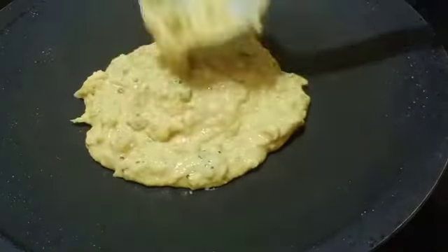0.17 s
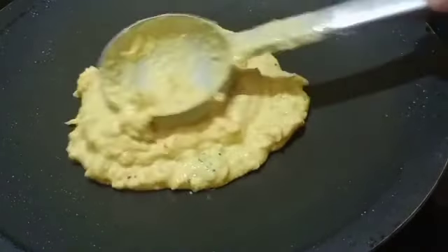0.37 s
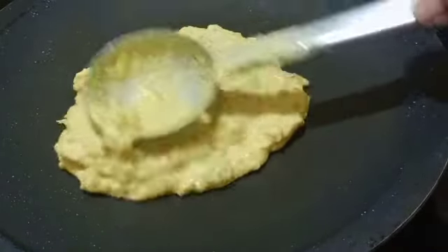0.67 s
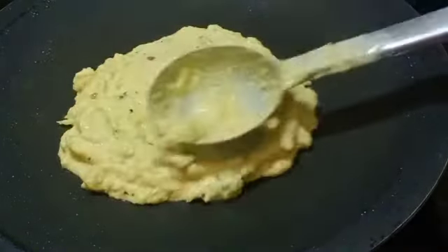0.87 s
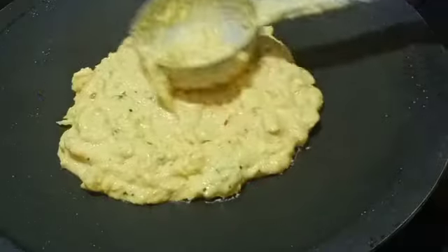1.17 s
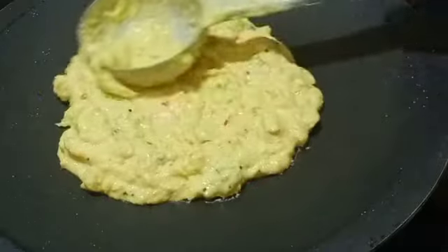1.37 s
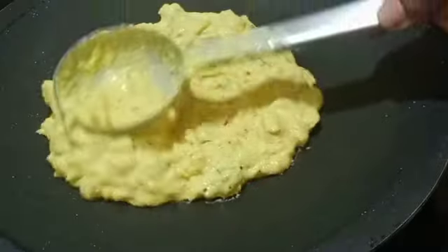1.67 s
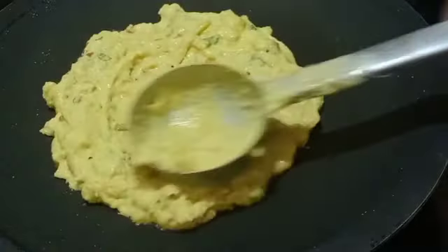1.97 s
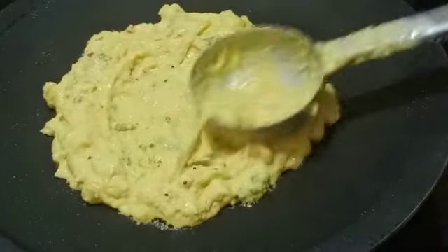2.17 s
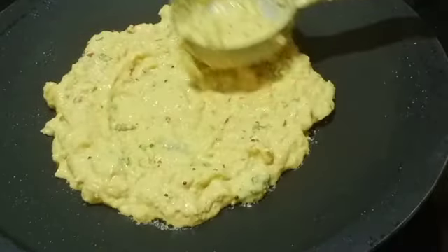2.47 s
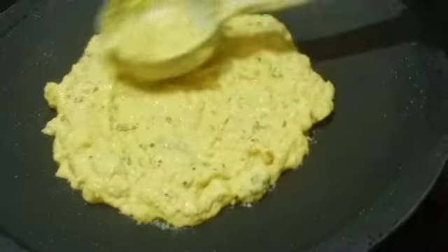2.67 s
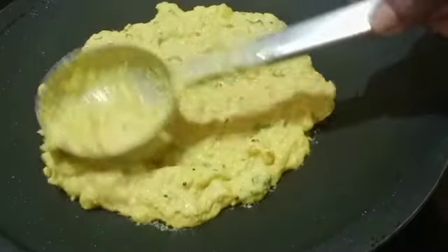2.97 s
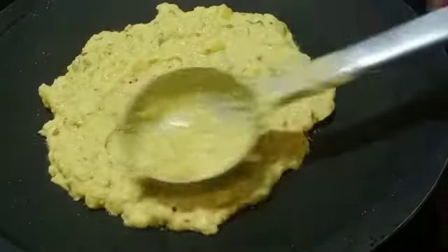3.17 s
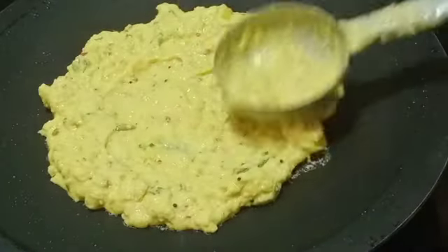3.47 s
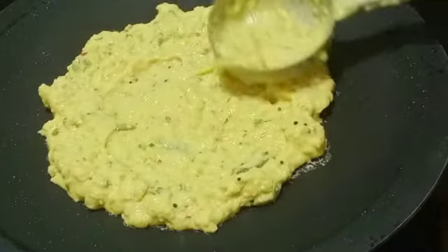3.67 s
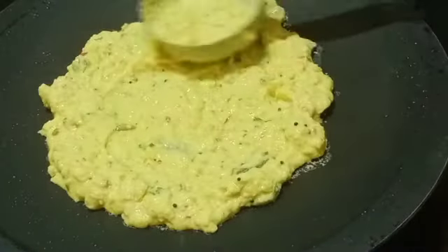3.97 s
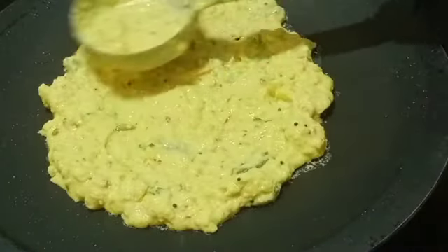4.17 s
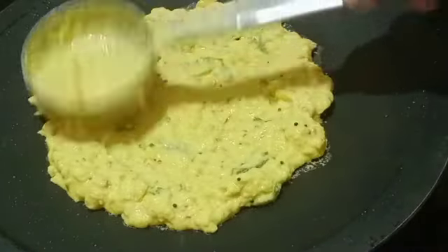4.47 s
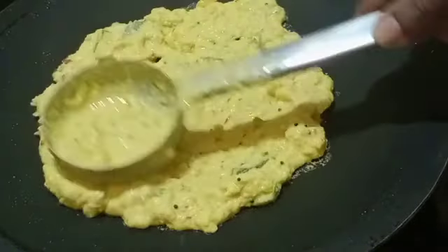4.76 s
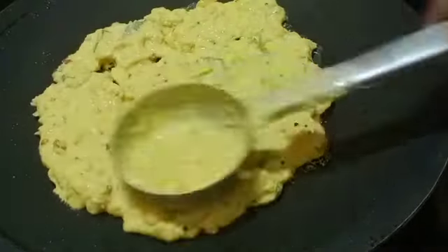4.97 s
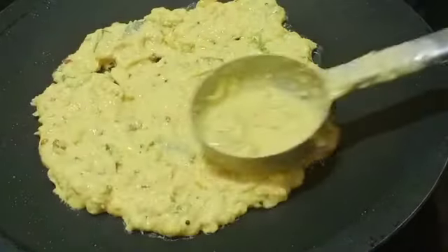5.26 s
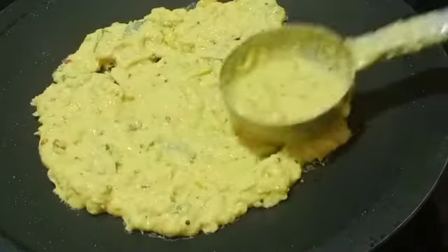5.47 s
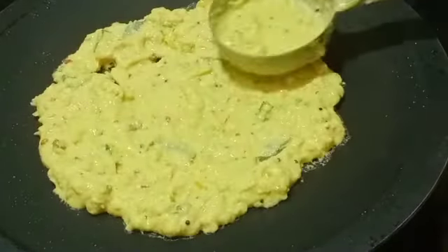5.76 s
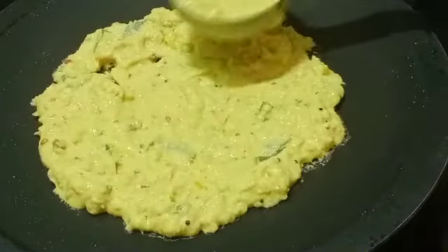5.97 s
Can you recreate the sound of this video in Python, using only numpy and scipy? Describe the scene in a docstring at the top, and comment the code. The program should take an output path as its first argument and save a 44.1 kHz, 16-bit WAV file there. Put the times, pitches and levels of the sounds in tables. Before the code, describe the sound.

Close, bright sizzling of batter on a griddle rises and falls with sharp little pops, while a fan drones behind it.

```python
"""A kitchen fan runs throughout, and thick batter poured on a hot griddle simmers and spits. From about
0.6 s a ladle spreads it in four circles. Each presses wet batter onto hot metal, where thousands of tiny
steam bubbles burst: a fine fizz at the edge, a lower sputter underneath. A faint whine fades after 2 s,
and the griddle rings less as batter covers it. Sharp spits crack to the end, the loudest near 4.3 s.
A close mono phone microphone, whose port rings near 9 kHz, hears it all in a small kitchen."""
import sys
import numpy as np
from scipy import signal
from scipy.fft import rfft, irfft
from scipy.io import wavfile
from scipy.ndimage import map_coordinates

SR = 44100
rng = np.random.default_rng(int(sys.argv[2]) if len(sys.argv) > 2 else 0)


def generate_wav(signal):
    """Clip the signal to [-1, 1] and save it as 16-bit WAV at the path in sys.argv[1]."""
    frames = np.transpose(np.atleast_2d(signal))
    scaled = np.clip(frames, -1, 1) * 32767
    pcm = np.round(scaled).astype(np.int16)
    wavfile.write(sys.argv[1], SR, pcm)


N = 270024
TIME = np.arange(N) / SR


def undb(db):
    """Decibels to gain."""
    return 10 ** (np.asarray(db) / 20)


def unit(x):
    """Scale to rms 1."""
    return x / np.sqrt(np.mean(x ** 2))


def power_sum(levels_db):
    """Level in dB of unrelated sounds heard together."""
    return 10 * np.log10(sum(undb(db) ** 2 for db in levels_db))


def drift(rate):
    """Smooth random movement of rms 1 that changes about rate times a second."""
    knots = rng.standard_normal(4096)
    return unit(map_coordinates(knots, [TIME * rate], order=3, mode="wrap"))


def colour(x, curve, size=4096):
    """Minimum-phase EQ through (Hz, dB) points, so that clicks keep their sharp front."""
    hz, db = np.transpose(curve)
    grid_hz = np.maximum(np.fft.rfftfreq(size, 1 / SR), 1)
    gain = undb(np.interp(np.log(grid_hz), np.log(hz), db))
    cepstrum = irfft(np.log(gain))
    cepstrum[1:size // 2] *= 2
    cepstrum[size // 2 + 1:] = 0
    impulse = irfft(np.exp(rfft(cepstrum)))
    return signal.fftconvolve(x, impulse)[:N]


def ringing(x, modes):
    """The ring that a sound drives in resonances given as (Hz, width in Hz, gain in dB)."""
    return sum(undb(db) * signal.lfilter(*signal.iirpeak(hz, hz / width, fs=SR), x)
               for hz, width, db in modes)


def kitchen(x, t60=0.23, room_db=-10):
    """A sound from one spot plus the short diffuse tail that close walls give it."""
    age = np.arange(SR // 4) / SR
    tail = rng.standard_normal(len(age)) * np.exp(-np.log(1000) * age / t60) * (age > .003)
    return x + undb(room_db) * signal.oaconvolve(x, tail / np.linalg.norm(tail))[:N]


def whine(hz=772, held_db=-65.5, fade_from_s=2.17, fade_db_per_s=50):
    """A thin, unsteady tone in the background holds, then fades away."""
    level_db = held_db - fade_db_per_s * np.maximum(TIME - fade_from_s, 0)
    phase = 2 * np.pi * np.cumsum(hz * (1 + 0.0126 * drift(30.1))) / SR
    return np.sqrt(2) * undb(level_db + drift(13)) * np.sin(phase)


def fan(shaft_hz=24.61, blades=7, air_db=-51):
    """Blade tone and shaft harmonics hum over the rush of air through the housing."""
    # The hum. Each row: multiple of the shaft rate, rms level in dB.
    hum_tones = [(4, -77), (5, -63.5), (6, -66), (7, -50.5), (8.08, -61.5), (9, -63.5), (10, -80.5),
                 (12, -65), (15, -69.5), (16, -62.5), (19, -64.5), (21, -74), (23, -65), (26, -72),
                 (30, -86), (32, -79)]
    # Tone of the rushing air. Each row: frequency in Hz, relative level in dB.
    air_eq = [(20, -30), (42, -38), (65, -3), (125, 3.5), (200, 1.5), (310, 3.5), (450, -3), (800, -5),
              (1300, -8.5), (2000, -17.5), (3700, -11.5), (4700, -24), (15000, -25.5)]
    # Resonances of the housing. Each row: frequency in Hz, width in Hz, gain in dB.
    housing_modes = [(775, 27, -18), (1370, 150, -7), (2456, 100, 13)]
    turns = np.cumsum(shaft_hz * (1 + 0.00076 * drift(1.603))) / SR
    hum = 0
    for multiple, db in hum_tones:
        # turbulence shakes the weak low harmonics most
        steady = multiple == blades or multiple > 14
        waver_db = (0.4 if steady else 2.0) * drift(5)
        phase = 2 * np.pi * (multiple * turns + rng.random())
        hum += np.sqrt(2) * undb(db + waver_db) * np.sin(phase)
    air = colour(rng.standard_normal(N), air_eq)
    air += ringing(air, housing_modes)
    return hum + unit(air) * undb(air_db + 0.48 * drift(5.16))


def stroke_db(start, length, response):
    """Boiling sets in as the ladle presses, changes steadily while it pushes, and dries as it eases."""
    attack, growth, drying = response
    onset = 1 - np.exp(-np.maximum(TIME - start, 1e-9) / attack)
    since_eased = TIME - start - length
    pressed_db = 10 * np.log10(onset) + growth * np.minimum(since_eased, 0)
    return pressed_db - drying * np.maximum(since_eased, 0)


def flare_db(peak_s, rise_s=0.036, fall_s=0.075):
    """A tongue of batter runs onto bare metal: a quick swell of steam that dies away."""
    age = TIME - peak_s
    swell = np.exp(-(np.minimum(age, 0) / rise_s) ** 2 - np.maximum(age, 0) / fall_s)
    return 10 * np.log10(swell + 1e-12)


def boiling():
    """Envelopes in dB for fizz, sputter and blisters: the simmer plus every stroke and flare."""
    # Circles of the ladle. Each row: start and length in seconds, then fizz, sputter and blisters in dB.
    strokes = [(0.576, 0.72, -34, -43, -55), (1.705, 0.69, -34.5, -43.5, -55.5),
               (3.205, 0.43, -35, -43, -61), (4.513, 0.92, -36, -43, -55)]
    # How each kind of bubble answers a stroke. Each holds: attack in seconds,
    # growth while pressed in dB per second, drying afterwards in dB per second.
    fizz_response = (0.09, 5.9, 7.8)
    sputter_response = (0.16, 0.49, 10.4)
    blister_response = (0.31, -10.5, 15)
    # Flares of the fizz. Each row: time of the peak in seconds, level in dB.
    flares = [(0.399, -45), (0.609, -41), (0.755, -37), (1.089, -34.5), (1.26, -35), (1.77, -39),
              (2.29, -34), (2.4, -32.5), (3.361, -40), (3.681, -31.5), (4.041, -36.5), (5.371, -34)]
    fizz, sputter, blisters = [-50], [-57.5], [-58.5]  # the heap of batter simmers by itself
    for start, length, fizz_db, sputter_db, blister_db in strokes:
        fizz.append(fizz_db + stroke_db(start, length, fizz_response))
        sputter.append(sputter_db + stroke_db(start, length, sputter_response))
        blisters.append(blister_db + stroke_db(start, length, blister_response))
    flaring_db = power_sum(db + flare_db(peak_s) for peak_s, db in flares)
    fizz.append(flaring_db)
    sputter.append(flaring_db - 17.5)  # a flare stirs the sputter too
    return power_sum(fizz), power_sum(sputter), power_sum(blisters)


def bubbles(per_second, eq, spread_db, spots=6):
    """Bubbles burst as clicks, most small, a few large, at spots with their own echoes; rms 1."""
    chance = np.clip(per_second / SR, 1e-4, 1)
    # a bubble can only grow so far before it bursts
    size = undb(spread_db * np.minimum(rng.standard_normal(N), 2.1))
    clicks = (rng.random(N) < chance) * size * rng.choice([-1, 1], N) / np.sqrt(chance)
    spot = rng.integers(spots, size=N)
    crackle = sum(kitchen(clicks * (spot == k)) for k in range(spots))
    return unit(colour(crackle, eq))


def griddle_ring(trapped, bare_db=3, covered_db=-1):
    """Trapped bubbles shake the griddle; spreading batter damps it, so the ring grows fainter."""
    # Modes of the metal. Each row: frequency in Hz, width in Hz, relative gain in dB.
    metal_modes = [(1510, 14, 4.5), (1656, 18, -6), (2206, 14, 4), (2296, 25, -5), (2470, 9, -3),
                   (2784, 23, -0.5), (3147, 28, -4.5), (3305, 56, 0), (3880, 10, -2), (4780, 50, -7)]
    ring_db = np.interp(TIME, [0, TIME[-1]], [bare_db, covered_db])
    return undb(ring_db) * ringing(trapped, metal_modes)


def sizzle(fizz_db, sputter_db, blister_db):
    """Bubbles of four sizes; harder boiling means more bursts, so lone crackles merge into a hiss."""
    # Tone of the bright fizz, the finest snaps, the midrange sputter and the dull blisters.
    # Each row: frequency in Hz, relative level in dB.
    fizz_eq = [(300, -18.5), (1000, -19), (2500, -18.5), (3600, -7.5), (5300, -10), (7000, -5.5),
               (9000, -0.5), (12000, -1), (15500, 0.5)]
    fine_eq = [(3000, -12), (7000, -8.5), (10000, 0.5), (13000, 4), (15500, -11.5)]
    sputter_eq = [(500, -35.5), (1500, -11), (2100, -10), (2700, -2), (3300, -3), (3900, -2.5), (4600, -9),
                  (6000, -8.5), (8000, -7), (15000, -21.5)]
    blister_eq = [(300, -19.5), (800, 1), (1500, 1), (2100, 7), (3000, -7.5), (6000, -42)]
    per_second = 7000 * undb(1.2 * (fizz_db + 36))
    # steam escapes freely along the edge
    fizz = bubbles(per_second, fizz_eq, spread_db=5.0) * undb(fizz_db - 3.5)
    # the finest bubbles snap singly and need a lively boil
    fine_db = fizz_db - 11 + 0.4 * np.minimum(fizz_db + 28, 0)
    fine = bubbles(0.059 * per_second, fine_eq, spread_db=7.5) * undb(fine_db)
    # bubbles trapped under the batter are muffled
    sputter = bubbles(1.2 * per_second, sputter_eq, spread_db=4.5) * undb(sputter_db - 0.18)
    blisters = bubbles(2000, blister_eq, spread_db=8.5) * undb(blister_db - 2.5)
    trapped = sputter + blisters
    return fizz + fine + trapped + griddle_ring(trapped)


def small_spits(fizz_db, per_second=5, scatter_db=1, knock_db=-18):
    """Cues for small spits at random moments, stronger when the fizz is."""
    starts = np.flatnonzero(rng.random(N) < per_second / SR)
    level_db = fizz_db + 15 - scatter_db * rng.standard_normal(N)
    return [(TIME[i], level_db[i], knock_db) for i in starts]


def spits(fizz_db, spray_s=0.0016):
    """Droplets of oil and water flash to steam: a sharp crack, a puff of spray, a knock on the metal."""
    # The loudest spits. Each row: start in seconds, relative level in dB, the knock's trim in dB.
    loud_spits = [(.101, -29, -13), (.131, -28, -12), (.1812, -25, -6), (.365, -27, -14), (.383, -33, -13),
                  (.592, -18.5, -17), (.607, -20, -16), (1.085, -16, -11), (1.122, -15, -17),
                  (1.285, -17, -31.5), (2.88, -22, -16), (3.121, -19.5, -6), (3.774, -20, -20),
                  (3.936, -20, -18), (4.2959, -12.5, -7), (4.339, -18, -14), (4.693, -16, -18),
                  (5.096, -20.5, -18), (5.361, -18, -16), (6.064, -20, -19)]
    # Tone of the crack and of the knock. Each row: frequency in Hz, gain in dB.
    crack_eq = [(200, -29), (1000, -19), (3300, -1), (5200, -2), (7500, -4), (10000, 3.5), (15500, -3)]
    knock_eq = [(100, -24), (300, -16), (1200, -4), (3200, -5), (5500, -11), (12000, -40)]
    cracks, knocks = np.zeros((2, N))
    age = np.arange(400) / SR
    for start_s, db, knock_db in loud_spits + small_spits(fizz_db):
        crack = 0.1 * rng.standard_normal(len(age)) * np.exp(-age / spray_s)
        crack[0] = -1  # the sharp front ahead of the spray
        start = int(start_s * SR)
        cracks[start:start + len(age)] += undb(db + 3.5) * crack[:N - start]
        knocks[start] -= undb(db + knock_db + 15)
    return kitchen(colour(cracks, crack_eq) + colour(knocks, knock_eq))


def scene():
    """Sizzle and spits over the fan and the whine, the same in both channels."""
    fizz_db, sputter_db, blister_db = boiling()
    mono = sizzle(fizz_db, sputter_db, blister_db) + fan() + whine() + spits(fizz_db)
    return np.array([mono, mono])


def record(dry, top_hz=15540):
    """The microphone port lifts the treble, and the very top is cut steeply."""
    # Resonance of the port. Its row: frequency in Hz, width in Hz, gain in dB.
    port_modes = [(8866, 1150, 8.5)]
    bright = dry + ringing(dry, port_modes)
    low_pass = signal.firwin(801, top_hz, window=("kaiser", 7), fs=SR)
    return signal.fftconvolve(bright, low_pass[None], mode="same", axes=1)


dry = scene()
out = record(dry)
generate_wav(out)
```